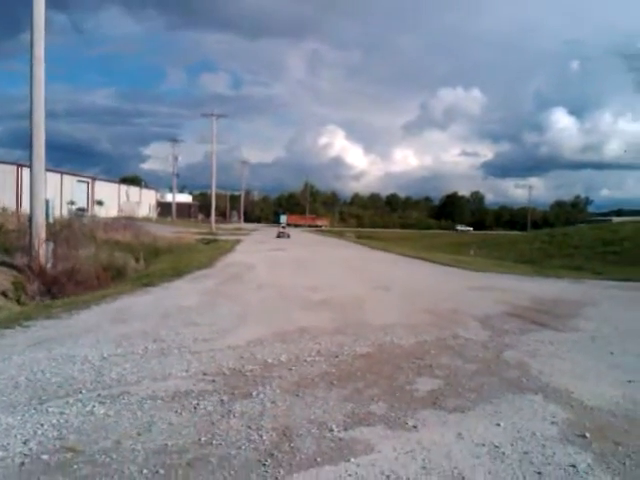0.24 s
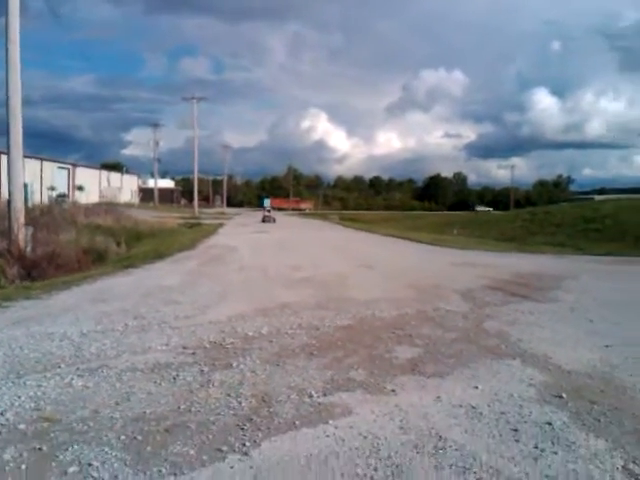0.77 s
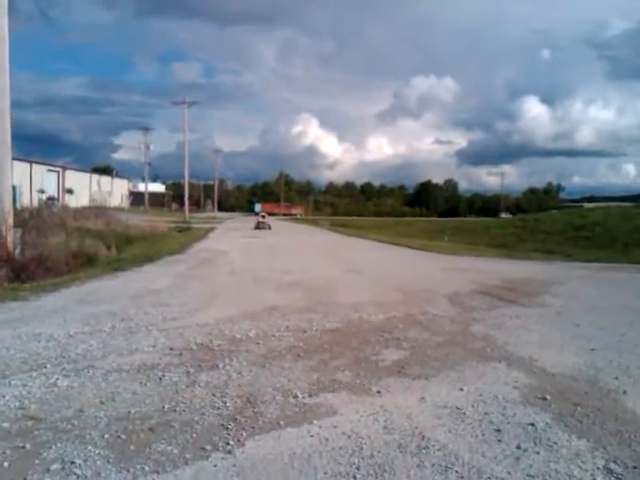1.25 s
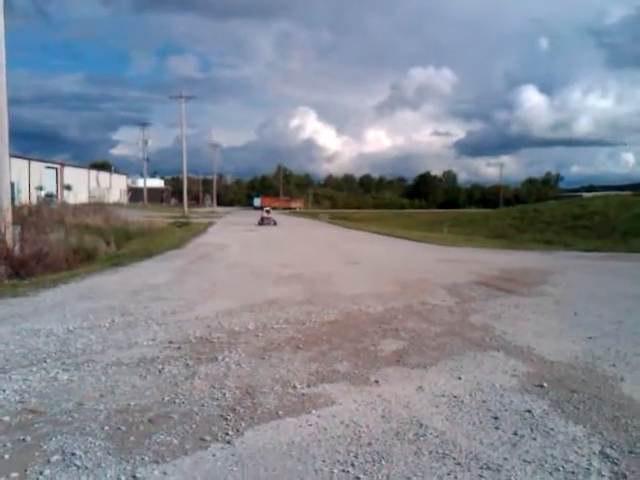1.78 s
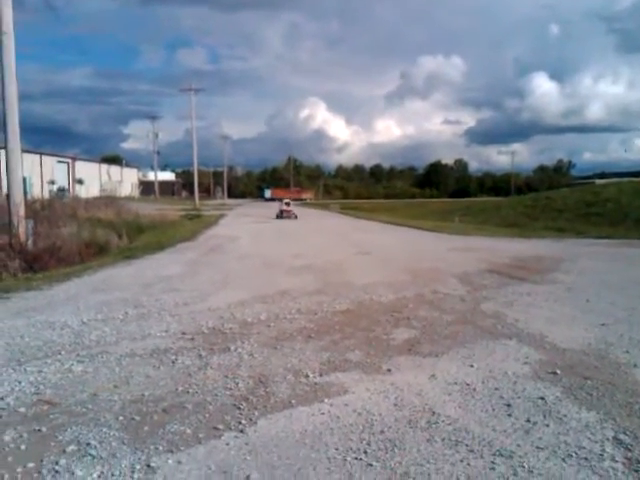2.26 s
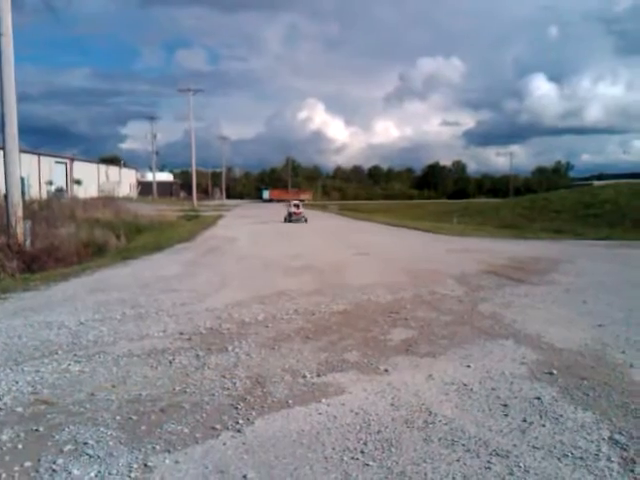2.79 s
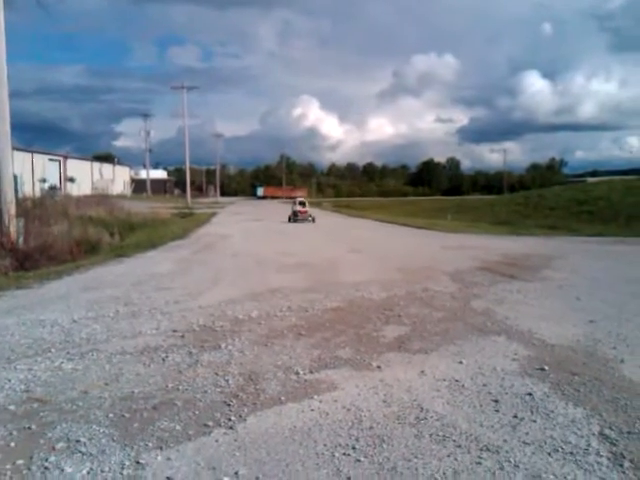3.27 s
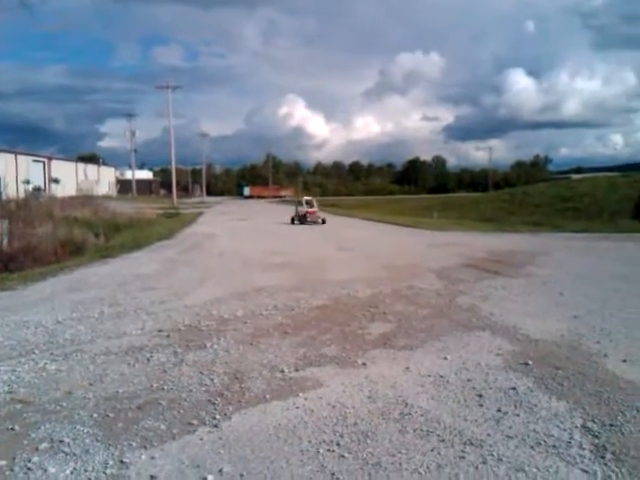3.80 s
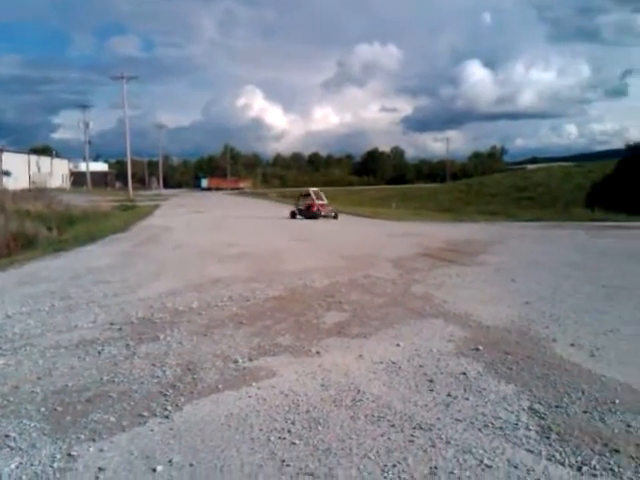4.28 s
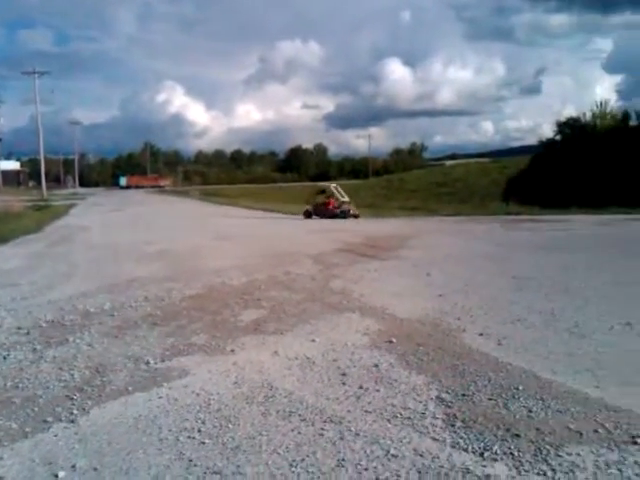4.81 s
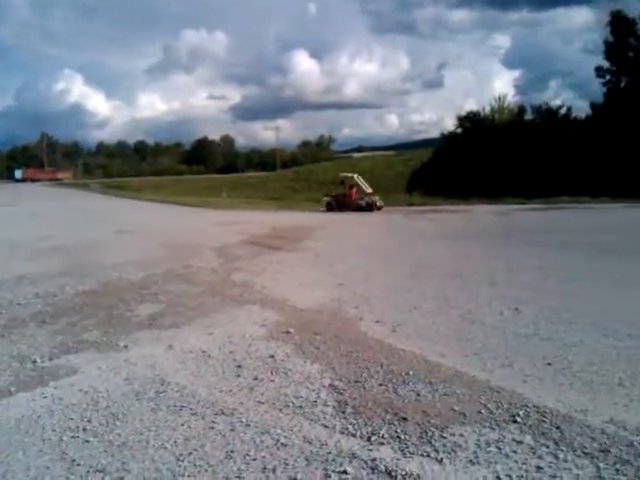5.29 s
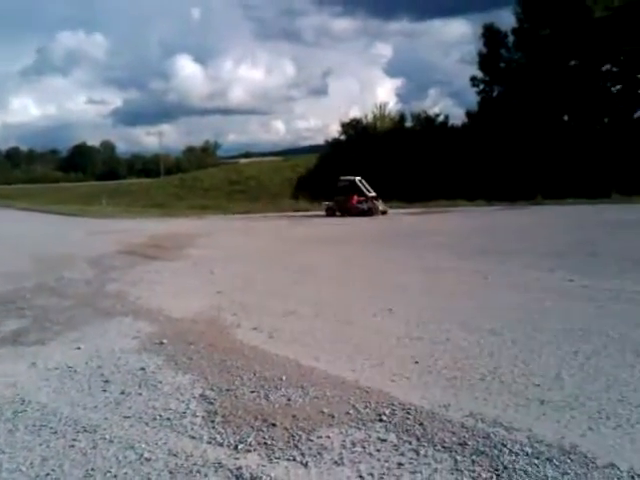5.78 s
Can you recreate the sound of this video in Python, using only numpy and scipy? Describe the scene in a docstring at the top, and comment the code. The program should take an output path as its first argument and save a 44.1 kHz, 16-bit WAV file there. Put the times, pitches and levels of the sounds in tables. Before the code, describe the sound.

A small kart putters nearer on gravel, stumbling and popping off the throttle, then rattling and sliding through a turn.

```python
"""Go-kart on gravel

A kart with a single-cylinder four-stroke engine drives up a gravel lot, passes and turns away.
Each exhaust stroke cracks, chugs and leaves the silencer ringing; twice the throttle shuts and the
engine stumbles and pops. The chain whines, valve gear and tyres grow as the kart nears, metal clanks
with the firings and the turn ends in a skid. A light breeze touches the microphone."""
import sys
import numpy as np
from scipy import signal
from scipy.fft import rfft, irfft, next_fast_len
from scipy.io import wavfile
from scipy.ndimage import uniform_filter1d

SR = 44100
rng = np.random.default_rng(int(sys.argv[2]) if len(sys.argv) > 2 else 0)


def master_out(mix):
    """Clip the mix to full scale and print it as 16-bit PCM to the path in sys.argv[1]."""
    frames = np.transpose(np.atleast_2d(mix))
    ceiling = np.clip(frames, -1, 1)
    pcm = np.round(ceiling * 32767).astype(np.int16)
    wavfile.write(sys.argv[1], SR, pcm)


N = 266805
TIME = np.arange(N) / SR


def amp(db):
    """Decibels to linear gain."""
    return 10 ** (np.asarray(db) / 20)


def unit_rms(x):
    """Normalises x to rms 1."""
    return x / np.sqrt(np.mean(x ** 2) + 1e-20)


def curve(rows, at, column=1):
    """Reads a breakpoint table along straight lines."""
    rows = np.asarray(rows, float)
    return np.interp(at, rows[:, 0], rows[:, column])


def noise():
    """White noise of rms 1."""
    return rng.standard_normal(N)


def eq(x, gain):
    """Filters x by a gain given as a function of frequency."""
    size = next_fast_len(N + 4096)
    return irfft(rfft(x, size) * gain(np.fft.rfftfreq(size, 1 / SR)), size)[:N]


def coloured(x, points):
    """Sends x through an EQ curve of (Hz, dB) points, then sets it to rms 1."""
    f, db = np.transpose(points)
    return unit_rms(eq(x, lambda hz: amp(np.interp(np.log(hz + 1), np.log(f), db))))


def wander(hz):
    """A smooth random modulator of rms 1, rolling off around hz."""
    return unit_rms(eq(noise(), lambda f: np.exp(-(f / hz) ** 2)))


def grains(per_s, spread_db):
    """Randomly timed clicks of uneven size, at rms 1."""
    size = amp(spread_db * np.minimum(rng.exponential(1, N), 4))
    return unit_rms(size * np.sign(noise()) * (rng.random(N) < per_s / SR))


# The engine's tempo: (time [s], firing rate [Hz])
FIRING_RATE = [(0.0, 20.69), (0.3, 21.65), (0.6, 22.17), (1.0, 22.87), (1.4, 23.42), (1.9, 23.97),
               (2.35, 24.29), (2.75, 23.76), (3.15, 22.44), (3.5, 22.02), (4.0, 21.53), (4.45, 21.15),
               (4.8, 21.02), (5.05, 21.16), (5.2, 21.02), (5.38, 21.46), (5.6, 20.21), (5.68, 20.65),
               (5.78, 19.72), (6.05, 18.99)]
def revs(at, cruise_hz=22):
    """Firings per second above cruising speed."""
    return curve(FIRING_RATE, at) - cruise_hz


def crank():
    """The engine's clock: cycle number and phase (0-1) per sample, and the exhaust opening times."""
    cycles = np.cumsum(curve(FIRING_RATE, TIME)) / SR + .49
    cycle = cycles.astype(int)
    opens = np.interp(np.arange(cycle[-1] + 2), cycles, TIME,
                      left=-.5 / FIRING_RATE[0][1], right=TIME[-1] + 1)
    return cycle, cycles % 1, opens


CLOSEST_M, CLOSEST_S, KART_M_PER_S, SOUND_M_PER_S = 8.47, 5.586, 8.14, 343
def pass_by(at):
    """The kart's distance [m] and closing speed [m/s]."""
    ahead = KART_M_PER_S * (CLOSEST_S - at)
    distance = np.hypot(CLOSEST_M, ahead)
    return distance, KART_M_PER_S * ahead / distance


# The kart's heading: (time [s], flank shown [0-1])
HEADING = [(0, 0.2), (4.1, 0.11), (4.6, 0.88), (5.4, 0.48), (6.05, 0.85)]
def flank(at):
    """How far the kart has turned its side to the microphone."""
    return curve(HEADING, at)


# Foot off the pedal: (start [s], end [s])
THROTTLE_SHUT = [(2.89, 3.385), (5.49, 6.3)]
def coasting(at, ramp_s=0.3):
    """Ramps from 0 to 1 when the throttle shuts, and back when it opens."""
    return sum(np.clip((at - start) / ramp_s, 0, 1) - np.clip((at - end) / ramp_s, 0, 1)
               for start, end in THROTTLE_SHUT)


# The driver pulls hard, eases off, gives half throttle and lifts: (time [s], opening [0-1])
THROTTLE = [(0, 0.97), (.5, 1.0), (1.5, 1), (2.3, 0.86), (3.45, 0.16), (4.1, 0.5), (6.05, 0)]
def fader(at, db, rev_db=0, throttle_db=0, flank_db=0):
    """Rides a layer's base level with distance, revs, pedal and heading; returns dB."""
    distance_db = 20 * np.log10(CLOSEST_M / pass_by(at)[0])
    pedal_db = throttle_db * (curve(THROTTLE, at) - 1)
    return db + distance_db + rev_db * revs(at) + pedal_db + flank_db * flank(at)


# Strokes that fail to fire: (time [s], charge lost [0-1])
MISFIRES = [(2.878, 0.26), (2.92, 0.6), (3.228, 0.55), (3.273, 0.31), (5.662, 0.48), (5.916, 0.26)]
# Strokes that only puff out cold, unburnt gas: (time [s], chug trim [dB])
COLD_PUFFS = [(3.052, -5.5), (3.095, -6.5), (3.318, -1.5), (5.565, -3.5), (5.713, -4), (5.815, -2),
              (5.968, -0.5)]
# The engine catches for one stroke: (time [s], chug trim [dB], crack trim [dB])
CATCHES = [(3.008, 1.5, -9.5), (3.139, 2.5, 1.5), (3.184, 2.5, -16), (3.363, 1, -12), (5.613, 2.5, -13),
           (5.763, 5.5, -7), (5.865, 4.5, -11), (6.02, 5.5, -16)]
def firings(opens, shut_chug_db=-0.5, shut_crack_db=-25.5, misfire_chug_db=-20, misfire_crack_db=-33):
    """Per stroke: chug level, crack level, blowdown trim (all dB) and a flag for cold gas."""
    trims = np.zeros((len(opens), 3))
    nearest = lambda s: np.argmin(abs(opens - s))
    for start, end in THROTTLE_SHUT:
        trims[(opens > start) & (opens < end)] = shut_chug_db, shut_crack_db, 0
    for s, lost in MISFIRES:
        trims[nearest(s)] = lost * misfire_chug_db, lost * misfire_crack_db, 0
    for s, chug_trim in COLD_PUFFS:
        trims[nearest(s)] = chug_trim, shut_crack_db, 1
    for s, chug_trim, crack_trim in CATCHES:
        trims[nearest(s)] = chug_trim, crack_trim, 0
    chug_trim_db, blowdown_db, cold = trims.T
    chug_db = fader(opens, db=-21, rev_db=1, throttle_db=-0.5, flank_db=-3.5) + chug_trim_db
    crack_db = fader(opens, db=-13.5, rev_db=1.17, throttle_db=6, flank_db=1.1) + blowdown_db
    snap = rng.standard_normal(len(opens))  # each stroke trades a little body for attack, or back
    return chug_db - 0.77 * snap, crack_db + 0.73 * snap, blowdown_db, cold


def silencer_note(at, cruise_hz=300.2, heat_hz_per_rev=6.53, cooling_hz=2.6):
    """The silencer's pitch follows the heat of the gas and sinks as the kart passes."""
    doppler = 1 + pass_by(at)[1] / SOUND_M_PER_S
    return (cruise_hz + heat_hz_per_rev * revs(at) - cooling_hz * coasting(at)) * doppler


# The pipe's pitch and level envelope: (cycle phase [0-1], pitch [x silencer note], level [dB])
PIPE_SWEEP = [(0, 0.52, 1), (.18, 0.597, 1.5), (.26, 1.066, 1.5), (.34, 0.99, -4), (.43, 1.022, -8),
              (.7, 0.971, -13), (1, 1, -14.5)]
def chug(cycle, phase, opens, level_db, blowdown_db, cold, detune=0.0075, cold_sag=0.25, linger_db=6,
         flank_db=-4, scatter_db=1.5, rev_db=-.5):
    """The open valve lets the cylinder load the pipe, so it rings low; the rising piston lifts it."""
    valve_open = np.exp(-(phase / 0.34) ** 4)
    tuning = 1 + detune * rng.standard_normal(len(opens))
    hz = silencer_note(TIME) * curve(PIPE_SWEEP, phase) * tuning[cycle]
    # cold gas starts lower and rings on longer
    turns = np.cumsum(hz * (1 - cold_sag * cold[cycle] * valve_open)) / SR
    tail_db = linger_db * cold[cycle]
    # the ring is shaded from the side, and no two firings strike it equally
    tail_db += flank_db * flank(TIME) + scatter_db * np.tanh(rng.standard_normal(len(opens)))[cycle]
    envelope_db = curve(PIPE_SWEEP, phase, column=2) + tail_db * (1 - valve_open)
    # at high revs the valve is open too briefly for the low end to build
    envelope_db += rev_db * np.maximum(revs(TIME), 0) * np.exp(-(phase / 0.25) ** 4)
    # a weak firing has no pressure behind it: it builds late, as the piston pushes the gas out
    weak = np.clip(-blowdown_db / 12, 0, 1)[cycle]
    angle = 2 * np.pi * (turns - np.interp(opens, TIME, turns)[cycle] - 0.11 - 0.12 * weak)
    attack = 1 - 0.66 * weak * (1 - 0.51 * cold[cycle]) * np.exp(-(phase / 0.17) ** 2)
    declick = np.clip(phase / .03, 0, 1) * np.clip((1 - phase) / .03, 0, 1)
    # strong swings steepen in the pipe and gain an octave
    surge_db = np.maximum(level_db - uniform_filter1d(level_db, size=9), 0)
    drive = 0.11 * (2.5 + 0.12 * surge_db)[cycle] * (1 - .7 * weak)
    octave = drive * amp(envelope_db) * np.clip(phase / 0.28, 0, 1) ** 2 * np.cos(2 * angle)
    return amp(level_db[cycle] + envelope_db) * attack * declick * (np.sin(angle) - octave)


# The pipe's overtones: (pitch [x silencer note], level [dB], t60 [s])
PIPE_MODES = [(1.182, -21.5, 0.052), (1.501, -12.5, 0.047), (2.079, -27.5, 0.053), (2.351, -22, .03)]
def crack(opens, level_db, pulse_s=.0004, rebound_s=0.00078, inlet_phase=0.2803, inlet_db=-11):
    """Blowdown: a pressure pulse, its rebound and the pipe's ring; a smaller pulse as the inlet opens."""
    out = np.zeros(N)
    for s, db in zip(opens, level_db):
        near = slice(*np.searchsorted(TIME, [s - .01, s + .1]))
        t = TIME[near] - s
        age, note = np.maximum(t, 0), silencer_note(s)
        width = pulse_s * (1 + 0.31 * flank(s))  # blunter from the side
        pulse = lambda delay: np.exp(-.5 * ((t - delay) / width) ** 2)
        inlet = amp(inlet_db) * pulse(inlet_phase / curve(FIRING_RATE, s))
        ring = sum(amp(mode_db - 60 * age / t60) * np.sin(2 * np.pi * ratio * note * age)
                   for ratio, mode_db, t60 in PIPE_MODES)
        out[near] += amp(db) * (0.68 * pulse(rebound_s) - pulse(0) + inlet + ring)
    return out


# The silencer's hollow voice: (frequency [Hz], gain [dB])
CHAMBER_EQ = [(70, -3.5), (130, 1.5), (200, 0), (300, 2.5), (420, 1.5), (470, 1), (515, -2), (560, -2),
              (630, 5), (700, 2), (820, -1), (1200, 5)]
def chambers(x):
    """The silencer's chambers hollow out the exhaust; minimum phase, so they ring only once struck."""
    f, db = np.transpose(CHAMBER_EQ)
    hz = abs(np.fft.fftfreq(4096, 1 / SR))
    log_gain = np.log(amp(np.interp(np.log(hz + 1), np.log(f), db)))
    impulse = np.fft.ifft(np.exp(np.conj(signal.hilbert(log_gain)))).real
    return signal.oaconvolve(x, impulse[:len(hz) // 2])[:N]


# Firings that spit harder or softer than the rest: (time [s], trim [dB])
ACCENTS = [(.074, 3.5), (.121, 4), (.168, 2), (.215, 1.5), (.261, 2.5), (.444, 3.5), (.491, 4.5), (.58, 1),
           (.626, 1), (.716, -2.5), (.76, -4.5), (.893, 4.5), (.981, -0.5), (1.025, -2), (1.07, -2.5),
           (1.155, 4.5), (1.284, 3.5), (1.327, 0.5), (1.412, -0.5), (1.455, -4), (1.499, 4.5), (1.63, 5),
           (1.836, 2.5), (2.04, 3.5), (2.127, -2.5), (2.208, 2), (2.29, -3), (2.75, -13), (2.79, -11),
           (3.008, -1), (3.228, -8), (3.41, -15), (3.588, 3), (3.96, 6), (4.193, -3), (4.238, -1),
           (4.333, -2), (4.427, -10), (4.52, -14), (4.664, 1), (4.76, 2.5), (5.042, -7), (5.18, 0),
           (5.28, 0)]
def accents(opens, scatter_db=2):
    """Per stroke: how much harder than usual the gas spits, in dB."""
    trim_db = scatter_db * np.clip(rng.standard_normal(len(opens)), -2, 2)
    for s, db in ACCENTS:
        trim_db[np.argmin(abs(opens - s))] += db
    return trim_db


# The rasp of escaping gas: (frequency [Hz], gain [dB])
SPIT_EQ = [(400, -15), (700, 2.5), (1100, -4.5), (1500, -8.5), (2100, 4), (2900, 0), (3400, -12),
           (3900, -27.5), (4700, -33.5), (6500, -38.5), (7500, -43.5)]
def spit(cycle, opens, force_db, delay_s=0.00072, rise_s=.0006, fall_s=.0012, tail_s=0.025, dull_hz=2400):
    """A burst of turbulent gas follows each blowdown, duller from the side."""
    age = np.maximum(TIME - opens[cycle] - delay_s, 0)
    attack = 1 - np.exp(-(age / rise_s) ** 2)
    decay = np.exp(-age / fall_s) + 0.15 * np.exp(-age / tail_s)
    level_db = fader(opens, db=-20.5, rev_db=-1, throttle_db=24.5, flank_db=11.5) + force_db
    bright = coloured(noise(), SPIT_EQ)
    dull = unit_rms(eq(bright, lambda f: 1 / (1 + (f / dull_hz) ** 10)))
    side = flank(TIME)
    return amp(level_db[cycle]) * attack * decay * ((1 - side) * bright + side * dull)


# The silencer's thin shell: (frequency [Hz], level [dB], t60 [s])
SHELL_MODES = [(1715, 1, 0.031), (2130, -7.5, .016), (2500, -0.5, 0.02), (2950, -6, 0.053)]
def shell_ping(opens, force_db, uneven_db=3, detune=0.0061, delay_s=.002):
    """Each blowdown pings the silencer's shell, never quite the same way twice."""
    out = np.zeros(N)
    level_db = fader(opens, db=-32, throttle_db=20, flank_db=0.5) + force_db
    for s, db in zip(opens, level_db):
        near = slice(*np.searchsorted(TIME, [s + delay_s, s + .03]))
        age = TIME[near] - s - delay_s
        for hz, mode_db, t60 in SHELL_MODES:
            strength, tuning, polarity = rng.standard_normal(3)
            decay = amp(db + mode_db + uneven_db * np.tanh(strength) - 60 * age / t60)
            out[near] += np.sign(polarity) * decay * np.sin(2 * np.pi * hz * (1 + detune * tuning) * age)
    return out


def lot_reverb(x, wet_db=-28, t60=0.27, echoes_per_s=2000):
    """Adds faint scatter from the ground, the sheds and the trees."""
    t = TIME[:SR // 2]
    taps = rng.standard_normal(len(t)) * (rng.random(len(t)) < echoes_per_s / SR) * amp(-60 * t / t60)
    return x + amp(wet_db) * signal.fftconvolve(x, taps / np.linalg.norm(taps))[:N]


# The rattle's rhythm: (cycle phase [0-1], level [dB])
RATTLE_ENVELOPE = [(0, -5.5), (.07, -8.5), (.19, -3.5), (.3, -2.5), (.45, -9.5), (.6, -6), (.8, -5.5),
                   (1, -1.5)]
# Resonances of casing and frame: (frequency [Hz], width [Hz], gain [dB])
CASING_PEAKS = [(256, 200, 4), (513, 150, 5.5), (943, 290, 0), (1257, 230, 2.5), (1720, 120, -3),
                (2150, 560, -7.5), (2550, 590, -9.5), (2926, 190, -9), (3180, 790, -17)]
def clatter(phase, flutter_db=2, rasp_hz=1950, rasp_width_hz=600, rasp_db=3, coasting_db=-4):
    """Valve gear and chain rattle the casing, hardest as the valves move; the flank is raspier."""
    blows = noise() + 0.96 * grains(per_s=700, spread_db=-0.5)
    blows *= amp(curve(RATTLE_ENVELOPE, phase) + flutter_db * wander(hz=45.5))
    casing = lambda f: np.sqrt(sum(amp(db) ** 2 / (1 + ((f - hz) / (width / 1.95)) ** 2) ** 2
                                   for hz, width, db in CASING_PEAKS))
    front = unit_rms(eq(blows, casing))
    raspy = unit_rms(eq(front, lambda f: amp(rasp_db * np.exp(-((f - rasp_hz) / rasp_width_hz) ** 2))))
    level_db = fader(TIME, db=-40.5, rev_db=2.5, throttle_db=-2.5, flank_db=5.5)
    side = flank(TIME)
    return amp(level_db + coasting_db * coasting(TIME)) * ((1 - side) * front + side * raspy)


# The valve's sizzle: (frequency [Hz], gain [dB])
VALVE_HISS_EQ = [(1000, -17), (2400, 13), (3300, 0.5), (4100, 1), (5000, -7.5), (6200, -11.5),
                 (7400, -24.5)]
def valve_hiss(cycle, opens, force_db, rise_s=0.0011, fall_s=0.01):
    """Gas sizzles past the exhaust valve, swelling as it lifts and fading through the stroke."""
    age = np.maximum(TIME - opens[cycle], 0)
    level_db = fader(opens, db=-40.5, throttle_db=-1, flank_db=1) + .5 * force_db
    swell = (1 - np.exp(-(age / rise_s) ** 2)) * np.exp(-age / fall_s)
    return amp(level_db[cycle]) * swell * coloured(noise(), VALVE_HISS_EQ)


# The drive's partials: (pitch [x firing rate], level [dB])
CHAIN_PARTIALS = [(16, 0), (24, 5), (28, -5)]
# The chain guard favours some pitches as the partials glide through: (frequency [Hz], gain [dB])
CHAIN_GUARD_EQ = [(330, 1), (360, 2.5), (390, 1), (505, -6), (540, 2.5), (560, -0.5), (585, -1.5),
                  (620, -4), (680, 2)]
def chain_whine(phase, slack_db=-10):
    """The chain meshes in step with the crank and sings under pull."""
    firing_hz = curve(FIRING_RATE, TIME)
    tones = sum(amp(db + curve(CHAIN_GUARD_EQ, order * firing_hz)) * np.sin(2 * np.pi * order * phase)
                for order, db in CHAIN_PARTIALS)
    level_db = fader(TIME, db=-40.5, rev_db=-0.5, throttle_db=26, flank_db=-14)
    return amp(level_db + slack_db * coasting(TIME)) * tones


# The bright crunch of rolling tyres: (frequency [Hz], gain [dB])
GRAVEL_EQ = [(500, -7.5), (2000, 0.5), (3150, 8), (3650, -4), (3950, 0), (4150, 7), (4330, -3.5),
             (4850, -2.5), (5400, -5.5), (6100, -6), (7000, -12), (7500, -35)]
def gravel(clump_db=4, coasting_db=-3):
    """Tyres grind and flick small stones in soft clumps, more so while they are driven."""
    crunch = noise() + 0.15 * grains(per_s=13000, spread_db=-5)
    crunch *= amp(clump_db * np.tanh(wander(hz=51.4)))
    level_db = fader(TIME, db=-50, rev_db=.5, throttle_db=4.5, flank_db=-0.5)
    return amp(level_db + coasting_db * coasting(TIME)) * coloured(crunch, GRAVEL_EQ)


# The scrape builds as the kart steers into the turn: (time [s], level [dB])
SCRAPE_LEVEL = [(0, -62), (1.3, -55.5), (2.6, -54.5), (3.2, -54.5), (3.6, -50.5), (4.15, -55), (4.6, -42.5),
                (5.1, -39), (5.35, -38), (5.6, -44), (6.05, -40)]
# Its dry midrange: (frequency [Hz], gain [dB])
SCRAPE_EQ = [(400, -8), (850, 6), (1050, 6.5), (1300, 5), (1750, 3.5), (2300, -1), (3000, -14),
             (3600, -31.5), (7000, -49.5)]
def scrape(clump_db=3):
    """Tyres drag sideways over packed gravel: a continuous crunch that ignores the engine's beat."""
    crunch = noise() + .9 * grains(per_s=900, spread_db=1)
    crunch *= amp(clump_db * np.tanh(wander(hz=35)))
    return amp(curve(SCRAPE_LEVEL, TIME)) * coloured(crunch, SCRAPE_EQ)


# The open-air bed: (frequency [Hz], gain [dB])
AIR_EQ = [(20, 0), (45, 1), (90, -6), (200, -1), (500, -11.5), (1000, -16.5), (4000, -53.5)]
# Low, soft thumps: (time [s], level [dB], half-width [s])
THUMPS = [(1.637, -32, 0.014), (1.68, -39.5, 0.012), (2.107, -43, 0.066), (4.11, -39, 0.033),
          (4.81, -28.5, 0.027), (5.568, -38, 0.08), (5.727, -33.5, 0.027), (5.82, -36, 0.023),
          (6.014, -39, 0.02)]
def air_and_thumps(air_db=-47, swell_db=2):
    """Outdoor rumble and low, soft thumps, some of wind, some under the sputtering engine's strokes."""
    thumps = sum(amp(db) * np.exp(-((TIME - s) / width) ** 2) for s, db, width in THUMPS)
    rumble = coloured(noise(), [(15, -14.5), (40, -4.5), (120, -11), (220, -9), (600, -54), (2000, -99)])
    bed = amp(air_db + swell_db * wander(hz=3.1)) * coloured(noise(), AIR_EQ)
    return bed + thumps * rumble


# Two dry ticks at the start: (time [s], level [dB])
TICKS = [(0.069, -39), (0.344, -39)]
def ticks(fall_s=.002):
    """Tiny bright ticks that die at once, as of flicked stones."""
    decays = sum(amp(db) * (TIME > s) * np.exp(-abs(TIME - s) / fall_s) for s, db in TICKS)
    return decays * coloured(noise(), [(500, -2), (2500, -2), (4000, 6), (6300, -10), (7500, -19)])


# Pops as the engine stumbles: (time [s], level [dB])
POPS = [(2.8817, -32), (2.9236, -39), (3.1407, -38), (3.230, -39), (5.6635, -31), (5.7748, -30)]
def pops(hz=610, half_width_s=.0035):
    """Unburnt charge goes off in the hot silencer with a short, hollow bark."""
    return sum(amp(db) * np.sin(2 * np.pi * hz * (TIME - s)) * np.exp(-((TIME - s) / half_width_s) ** 2)
               for s, db in POPS)


# Short metallic clanks, mostly on the firings, as the kart passes: (time [s], level [dB], decay [s])
CLANKS = [(4.289, -36, 0.012), (4.311, -39, 0.021), (4.332, -38, 0.01), (4.379, -35.5, 0.024),
          (4.427, -33, 0.0081), (4.473, -43, 0.0072), (4.565, -38, 0.0055), (4.614, -37, .009),
          (4.663, -31.5, 0.032), (4.76, -39, 0.027), (4.79, -32, 0.022), (5.041, -30.5, 0.0063),
          (5.121, -32, 0.0075), (5.219, -29.5, 0.031), (5.281, -32, .012), (5.324, -32.5, 0.032),
          (5.374, -31.5, 0.013), (5.423, -32, 0.021), (5.594, -28, 0.0063), (5.792, -35, .006),
          (5.817, -28, 0.0083), (5.872, -34, .007), (6.017, -31, 0.057)]
# The frame's metallic ring: (frequency [Hz], level [dB], t60 [s])
FRAME_MODES = [(1303, 2, 0.021), (1433, -5.5, 0.022), (1750, 5.5, 0.01), (1807, -5, 0.058),
               (2086, 5.5, 0.0061), (2326, 2, 0.016), (3030, -14.5, 0.0077)]
def clanks(lowpass_hz=3100):
    """Loose parts strike the frame in quick, dying clusters."""
    shaking = sum(amp(db) * (TIME > s) * np.exp(-abs(TIME - s) / decay) for s, db, decay in CLANKS)
    t = TIME[:SR // 10]
    ring = sum(amp(db - 60 * t / t60) * np.sin(2 * np.pi * hz * t) * (-1) ** k
               for k, (hz, db, t60) in enumerate(FRAME_MODES))
    strikes = unit_rms(eq(grains(per_s=3200, spread_db=-1), lambda f: 1 / (1 + (f / lowpass_hz) ** 8)))
    steady_rms = np.std(signal.oaconvolve(strikes, ring)[:N])
    return signal.oaconvolve(strikes * shaking, ring)[:N] / steady_rms


# The tyres slide in the turn: (peak time [s], level [dB])
SKIDS = [(5.768, -36), (6.03, -33.5)]
# The slide's broad, gritty rush: (frequency [Hz], gain [dB])
SKID_EQ = [(150, -10.5), (450, 4.5), (800, 4), (1050, 3.5), (1300, 4.5), (1520, -4.5), (1750, 4.5),
           (2000, -4), (2300, 4.5), (2650, -0.5), (3200, -2), (3450, -12), (3800, -10), (4400, -16),
           (4800, -14), (5200, -17.5), (6100, -23), (6500, -37.5)]
def skid(rise_s=0.25, fall_s=0.076, clump_db=2.5):
    """Sliding tyres plough the gravel: a rush that swells slowly and dies quickly."""
    swell = sum(amp(db) * np.exp(-((TIME - s) / np.where(TIME < s, rise_s, fall_s)) ** 2)
                for s, db in SKIDS)
    crunch = noise() + 0.59 * grains(per_s=1000, spread_db=0.5)
    crunch *= amp(clump_db * wander(hz=60))
    return swell * coloured(crunch, SKID_EQ)


def scene():
    """The mono mix: exhaust with a touch of reverb; machinery, tyres and air dry."""
    cycle, phase, opens = crank()
    chug_db, crack_db, blowdown_db, cold = firings(opens)
    force_db = blowdown_db + accents(opens)
    pulses = chug(cycle, phase, opens, chug_db, blowdown_db, cold) + crack(opens, crack_db)
    exhaust = chambers(pulses) + spit(cycle, opens, force_db) + shell_ping(opens, force_db) + pops()
    machinery = clatter(phase) + clanks() + valve_hiss(cycle, opens, force_db) + chain_whine(phase)
    kart = lot_reverb(exhaust) + machinery + gravel() + scrape() + skid()
    return (kart + air_and_thumps() + ticks())[None]


# The microphone's narrow dips and one peak: (frequency [Hz], half-width [Hz], gain [dB])
MIC_EQ = [(1090, 99, -4.5), (1508, 37, -7), (1940, 30, -6.5), (3980, 150, -13.5), (3964, 110, 5.5),
          (4300, 79, -4.5), (5520, 250, -2.5)]
def record(dry, bass_hz=80, bass_floor=0.32, top_hz=7350):
    """A small microphone with weak bass, a few dips and a steep high cut."""
    bass = lambda f: bass_floor + (1 - bass_floor) / (1 + (bass_hz / (f + 1)) ** 6)
    dips = lambda f: amp(sum(db * np.exp(-((f - hz) / width) ** 2) for hz, width, db in MIC_EQ))
    thin = eq(dry[0], lambda f: bass(f) * dips(f))
    high_cut = signal.firwin(511, top_hz, window=("kaiser", 9), fs=SR)
    return signal.oaconvolve(thin, high_cut, "same")[None]


dry = scene()
out = record(dry)
master_out(out)
```